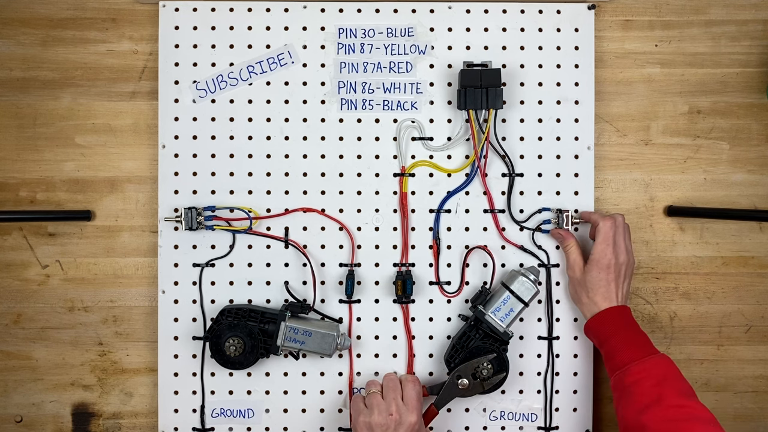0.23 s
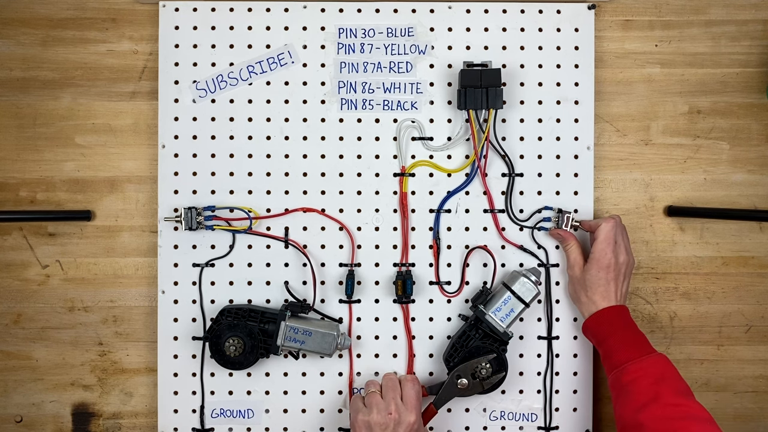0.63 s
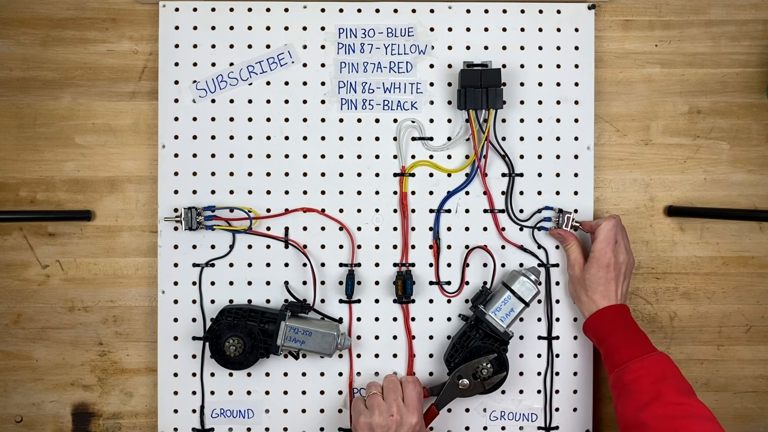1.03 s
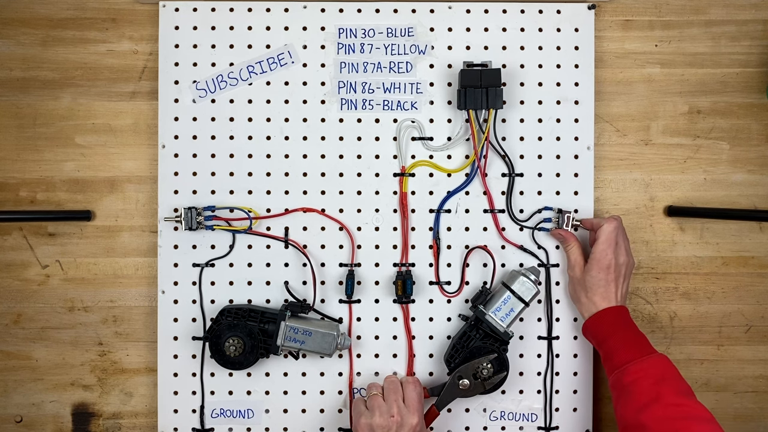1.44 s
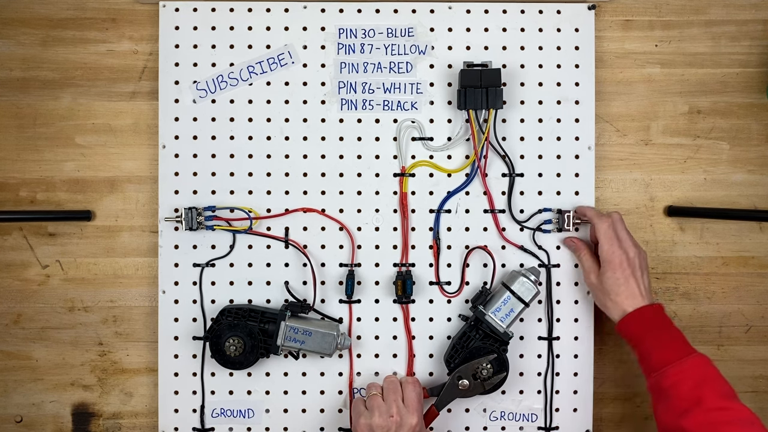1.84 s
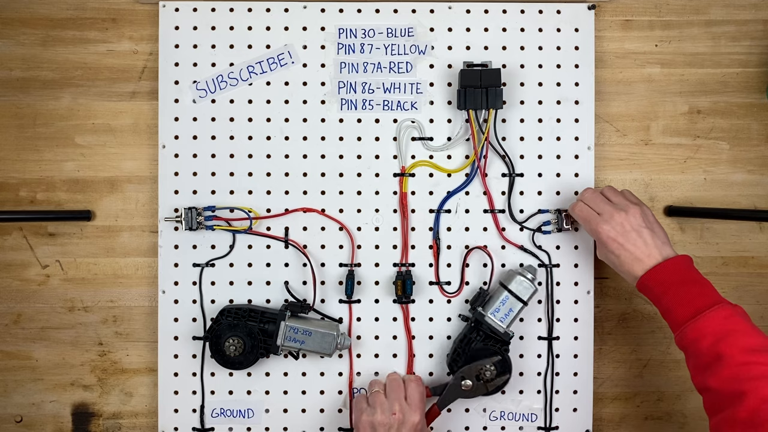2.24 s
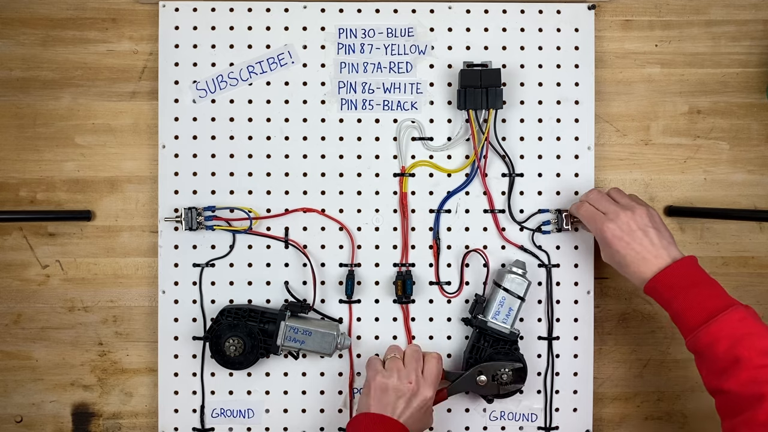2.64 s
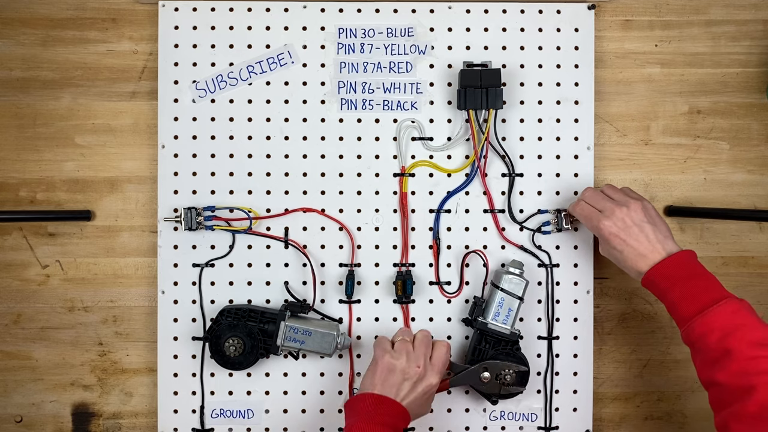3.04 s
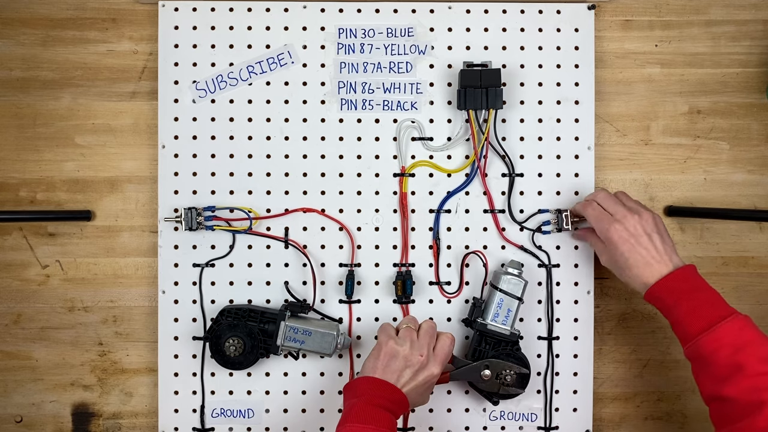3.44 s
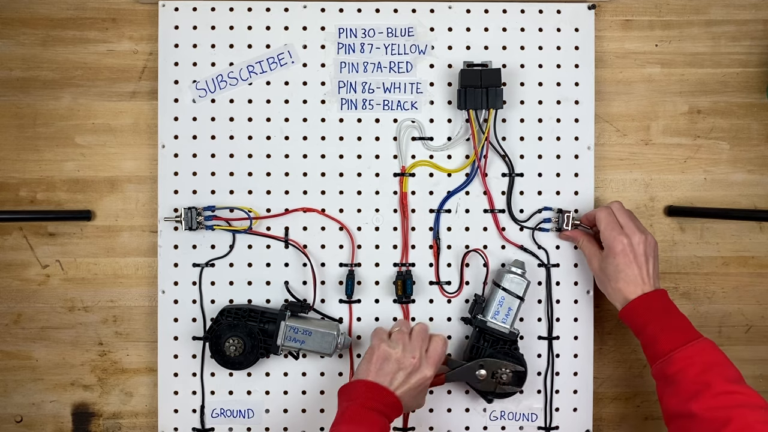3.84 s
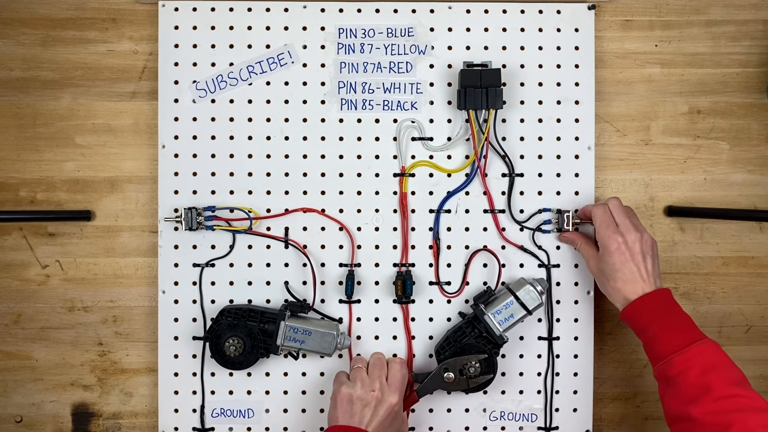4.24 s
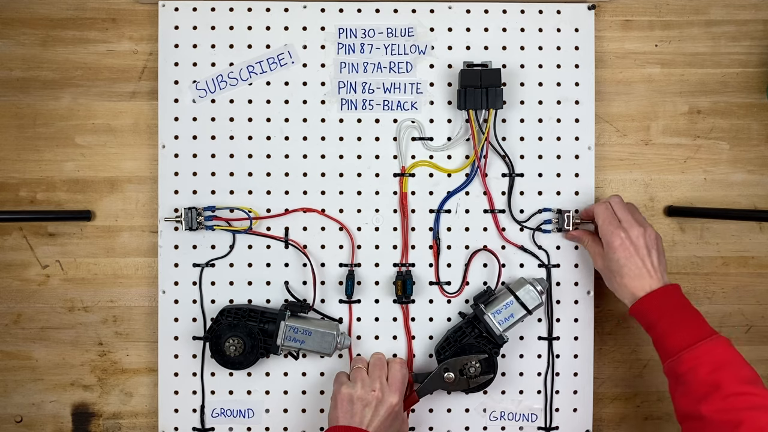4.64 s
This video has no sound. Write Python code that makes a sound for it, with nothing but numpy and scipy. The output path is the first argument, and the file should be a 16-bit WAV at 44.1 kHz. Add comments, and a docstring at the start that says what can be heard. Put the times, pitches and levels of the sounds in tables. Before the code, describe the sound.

A loud steel clatter and board thud come right after the first relay click, then a run of quick alternating switch clicks. After two seconds a gripped motor jerks and whirs briefly, pliers knock and clack, and fingers tap the board. Two more short motor growls follow among further clicks. Close microphone, short small-room echo, low bench rumble, faint buzzing high whine and almost silent air.

```python
"""Toggle switch, relay and geared motor

A toggle switch on a pegboard is flicked on and off; a relay follows it and drives a geared motor gripped
with pliers, which slam on the board or whir under load. Fingers tap, the bench thumps and a supply whines.
Clicks, knocks and taps are short chatters of random contacts sent through filters shaped like each object.
The motor is a stream of grains under a changing load, plus a sung tone; the whine is a swept sine.
Filtered noise makes the bench rumble and the air, and dying bands of noise make the small room."""
import sys
import numpy as np
from scipy import signal
from scipy.fft import rfft, irfft, next_fast_len
from scipy.io import wavfile
from scipy.ndimage import uniform_filter1d

SR = 44100
rng = np.random.default_rng(int(sys.argv[2]) if len(sys.argv) > 2 else 0)


def store_pcm(level_fs):
    """Save levels as 16-bit WAV."""
    pcm = np.round(np.clip(level_fs, -1, 1) * 32767).astype(np.int16)
    wavfile.write(sys.argv[1], SR, np.atleast_2d(pcm).T)


def ratio_of_db(decibels):
    """Turn decibels (scalar or array-like) into linear amplitude factors; 0 dB maps to 1."""
    return 10 ** (np.asarray(decibels, float) / 20)


N = 215252

# Levels in the tables are relative: the functions add a gain or even out the loudness. switch on: relay
# landing, toggle snap, faint haze before them (relay_s, relay_db, toggle_db, haze_db)
SWITCH_ON = [(0.2384, -13, -13.5, -49), (0.933, -13.5, -14, -59.5), (1.277, -13.5, -17.5, -56.5),
             (1.533, -14.5, -14.5, -57.5), (2.165, -12.5, -17, -63), (2.9195, -13.5, -21.5, -51),
             (3.7752, -12.5, -19.5, -57), (4.3542, -13.5, -18.5, -63), (4.8548, -13, -24, -63.5)]
# switch off: click, lever knock on the board and its rebound (click_s, level_db, knock_db, rebound_db, rebound_after_s)
SWITCH_OFF = [(0.7063, -6.5, -27.5, -38, 0.048), (1.17, -6, -28.5, -33.5, 0.043),
              (1.447, -6, -27.5, -36.5, 0.048), (1.695, -6, -26.5, -36, 0.027),
              (4.0874, -6.5, -34.5, -46, 0.046), (4.6053, -6, -36, -51, 0.088)]
# pliers slam on the board (start_s, level_db, hardness_hz, chatter_t60_s, board_thud_db)
PLIER_SLAMS = [(.266, 6.5, 8994, 0.05, -12.5), (2.282, -1, 12140, 0.052, -34),
               (2.426, -5.5, 7900, 0.0566, -44.5)]
# plier jaws clack on the gear (start_s, level_db, hardness_hz, chatter_t60_s)
JAW_CLACKS = [(2.327, -7.5, 9200, 0.05), (3.3607, -5.5, 11970, 0.034)]
# fingers and wires tap the board (start_s, level_db, hardness_hz, chatter_t60_s, swell_ms)
BOARD_TAPS = [(1.436, -32.5, 699, 0.036, 1.0), (1.555, -26, 1500, 0.027, 0.62),
              (1.946, -43, 120, 0.04, 2.6), (2.579, -43, 200, 0.13, 4.8), (2.757, -29, 1080, 0.077, 0.71),
              (2.878, -26, 900, 0.051, 1.8), (2.939, -22, 1600, 0.022, 0.54), (3.082, -29, 499, 0.03, 1.5),
              (3.361, -26, 704.4, 0.1, 0.74), (3.402, -23.5, 2520, 0.075, 0.27),
              (3.477, -42, 1500, 0.061, 3.5), (3.493, -29, 3820, 0.062, 5.3),
              (3.933, -18.5, 504, 0.044, 2.3), (4.408, -42.5, 1503, 0.03, 0.56),
              (4.585, -26, 2500, 0.039, 1.95)]
# thin ticks as the lever's play is taken up (start_s, level_db, hardness_hz, chatter_t60_s)
LEVER_TICKS = [(2.095, -35, 9020, 0.047), (1.581, -42, 15000, 0.028), (2.757, -42, 9000, 0.045),
               (3.356, -30, 9100, 0.0075), (3.720, -40, 4950, 0.07), (3.750, -40, 15020, 0.15),
               (4.717, -48, 6010, 0.07), (4.807, -31.5, 9020, 0.071)]
# a finger slides off the lever (start_s, attack_s, hold_s, release_s, level_db)
FINGER_SLIDE = (1.715, .04, .11, .09, -56)
# three motor runs: load on the gears and ring of the housing (time_s, load_db, housing_db)
MOTOR_RUNS = [
    [(2.17, -46, -47), (2.205, -43, -49), (2.232, -36.5, -57), (2.255, -41, -39), (2.28, -44.5, -38.5),
     (2.36, -54, -55), (2.42, -54, -49.5)],
    [(2.926, -58, -57), (2.97, -53, -46.5), (3.03, -55.5, -53.5), (3.06, -58, -49), (3.15, -71, -54),
     (3.20, -61.5, -55.5), (3.24, -71.5, -60.5)],
    [(3.78, -55.5, -41), (3.80, -44, -40), (3.822, -47, -52), (3.84, -45.5, -48), (3.875, -35.5, -37),
     (3.925, -35, -45), (3.94, -40.5, -53), (3.96, -50.5, -47)],
]
# how gears, brushes and shaft answer the load (level_at_mean_load_db, share_of_load_swing, startup_surge_db)
LOAD_RESPONSE = {"gears": (-45, 0.99, -88), "brushes": (-54, 0.86, -48.5), "shaft": (-57.5, -0.081, -39.5)}
# the pliers' grip in each run detunes the housing and damps the shaft (pitch_ratio, shaft_db)
PLIER_GRIP = [(.83, -10), (1.01, -7), (1.005, -12)]
# a gear tooth catches and the casing rings briefly (start_s, level_db, pitch_hz)
TOOTH_CATCHES = [(2.191, -37, 1090), (2.229, -36, 2380), (2.255, -33, 900), (2.973, -37.5, 1140),
                 (3.011, -37, 1050), (3.796, -36.5, 1120), (3.833, -31.5, 848), (3.872, -29, 2280),
                 (3.880, -43, 1060), (3.921, -38, 1090), (3.935, -30, 2540)]
# jolts to the bench: deep rumble and boom of its top (peak_s, rumble_db, boom_db, swell_s)
BENCH_JOLTS = [(0.272, -45.5, -34, 0.046), (0.302, -34.5, -36.5, 0.05), (2.26, -41.5, -55, 0.17),
               (2.302, -53.5, -33.5, 0.013), (2.34, -50, -49, .04), (2.451, -74.5, -51.5, 0.12),
               (2.789, -50, -52.5, 0.077), (2.961, -54, -47.5, 0.09), (3.129, -69, -55, 0.32),
               (3.38, -72, -54, 0.058), (3.946, -41.5, -37, 0.13), (3.982, -41, -43.5, 0.051),
               (4.02, -51, -53, 0.041), (4.631, -69.5, -54.5, 0.07), (4.875, -50, -57.5, 0.044)]
# the bench at rest, one level each for rumble and boom (level_db)
BENCH_REST = (-66, -72.5)
# supply whine over one ripple of the mains (share_of_cycle, pitch_hz, level_db)
WHINE_SWEEP = [(0, 6450, -72.5), (0.072, 7800, -68.5), (.15, 8900, -68.5), (0.231, 9480, -67),
               (0.331, 9540, -63.5), (.45, 9240, -70), (.7, 7940, -66.5), (1, 6435, -80)]
# how long the room rings, before the share that each sound gets (pitch_hz, t60_s)
ROOM_DECAY = [(200, 0.28), (1000, 0.31), (4000, 0.34), (9000, 0.28), (16000, 0.17)]

# relay, broad colour (pitch_hz, level_db)
RELAY_COLOUR = [(300, -46), (1100, -23), (2100, -17), (3000, -3), (5100, 2.5), (7700, -5.5), (9900, -1),
                (12500, -6), (16100, -11)]
# relay, resonances (pitch_hz, width_hz, level_db)
RELAY_RINGS = [(3150, 200, -1), (4160, 110, -0.5), (5110, 150, -4), (5800, 300, -3), (7530, 110, 0),
               (9860, 160, 1), (11400, 150, -3), (14600, 300, -5.5)]
# toggle snapping on, broad colour (pitch_hz, level_db)
TOGGLE_COLOUR = [(180, -64.5), (300, -43.5), (979, -4.5), (3650, -14.5), (4690, -22.5), (6440, -5),
                 (8840, -7.5), (10800, -0.5), (16100, -9)]
# switch releasing, broad colour (pitch_hz, level_db)
RELEASE_COLOUR = [(300, -39), (1000, -24), (1900, -17), (2900, 1), (4000, -14), (4700, -18), (8200, -11),
                  (9500, -13), (14000, -9), (16100, -19.5)]
# switch releasing, resonances (pitch_hz, width_hz, level_db)
RELEASE_RINGS = [(2360, 120, -6.5), (2908, 125, 1), (3994, 153, -2.5), (5130, 120, -5), (5660, 140, -8),
                 (6170, 99, -9), (7510, 100, -5), (8240, 220, -0.5), (10680, 680, -8.5), (14660, 400, -6)]
# spring that rings on after the release, resonances (pitch_hz, width_hz, level_db)
SPRING_RINGS = [(2345, 20, -4), (2735, 9, -5), (2846, 8, 0), (2920, 10, -3), (3020, 8, -4), (3453, 14, -10),
                (3905, 12, -4)]
# pegboard, broad colour (pitch_hz, level_db)
BOARD_COLOUR = [(120, -46), (200, -33.5), (492, -23), (935, 2.5), (1590, -12.5), (1750, -3.5), (2390, -7),
                (7450, -11.5), (16100, -30)]
# pegboard, resonances (pitch_hz, width_hz, level_db)
BOARD_RINGS = [(620, 27, 1.5), (854, 30, 8), (954, 14, 7.5), (1630, 71, 12.5), (2380, 41, 10),
               (3210, 25, -9), (4300, 30, -5), (6010, 56, -0.5)]
# thud of the board under a slam, resonances (pitch_hz, width_hz, level_db)
THUD_RINGS = [(238, 20, -14), (460, 60, -10.5), (504, 30, -2), (875, 45, -8), (958.5, 59, -1),
              (1092, 18, -2)]
# steel pliers, broad colour (pitch_hz, level_db)
PLIERS_COLOUR = [(35, -47), (100, -28), (320, -31), (600, -11), (1000, -4), (1630, -6), (2100, -6),
                 (2920, -9.5), (7790, -3), (16100, -10.5)]
# steel pliers, resonances (pitch_hz, width_hz, level_db)
PLIERS_RINGS = [(1390.6, 71, 3.5), (1500, 45, -4.5), (1620, 59, 0.5), (2115, 120, 3.5), (2280, 65, 1.5),
                (2360, 17, 1), (5500, 410, -9.5), (7900, 260, -10)]
# plier jaws, broad colour (pitch_hz, level_db)
JAWS_COLOUR = [(180, -69), (300, -61), (843, -55), (2570, -13.5), (4110, 3.5), (5100, -3.5), (6880, 6.5),
               (9450, -7), (11700, -2), (16100, -21)]
# plier jaws, resonances (pitch_hz, width_hz, level_db)
JAWS_RINGS = [(3080, 140, 0.5), (4360, 50, -5), (6870, 130, 11), (7700, 150, 3), (10750, 300, -3.5)]
# switch lever, broad colour (pitch_hz, level_db)
LEVER_COLOUR = [(290, -71), (500, -20.5), (1230, -8), (1620, 4.5), (4530, -12), (5550, 6), (8450, -18),
                (16000, -1.5)]
# skin rubbing over the lever, also the colour of the haze before clicks, broad colour (pitch_hz, level_db)
SKIN_COLOUR = [(180, -47.5), (300, -26), (603, -27), (762, -4.5), (1140, -15), (1230, -8.5), (2360, -12),
               (16000, -16.5)]
# gear teeth, broad colour (pitch_hz, level_db)
GEARS_COLOUR = [(150, -70), (250, -55), (758, -4), (1010, -6.5), (1090, -13.5), (1170, -10), (2330, -9),
                (9000, -18), (11700, -39.5), (19800, -120)]
# gear teeth, resonances (pitch_hz, width_hz, level_db)
GEARS_RINGS = [(2269, 110, -4), (3595, 110, -5), (2910, 70, -4.5)]
# motor housing before the grip detunes it, resonances (pitch_hz, width_hz, level_db)
HOUSING_RINGS = [(1092, 60, -2), (860, 60, -3), (1350, 70, -4)]
# motor brushes, broad colour (pitch_hz, level_db)
BRUSHES_COLOUR = [(2000, -18), (6000, -6), (11000, 2.5), (16000, -7)]
# motor shaft, resonances (pitch_hz, width_hz, level_db)
SHAFT_RINGS = [(9170, 45, -7), (10500, 50, 0), (10620, 55, -2), (7500, 80, -13)]
# faint flat floor under pure resonances (pitch_hz, level_db)
FAINT_FLOOR = [(100, -50), (16000, -50)]
# deep rumble through the bench legs, broad colour (pitch_hz, level_db)
RUMBLE_COLOUR = [(15, -8), (35, 7), (60, -3), (100, -11.5), (300, -41.5), (1500, -76)]
# boom of the bench top, broad colour (pitch_hz, level_db)
BOOM_COLOUR = [(40, -46.5), (80, -25), (170, -24), (450, -21), (1500, -67.5)]
# boom of the bench top, resonance (pitch_hz, width_hz, level_db)
BOOM_RINGS = [(108.6, 18, 0.0077)]
# quiet air of the workshop, broad colour (pitch_hz, level_db)
AIR_COLOUR = [(150, 4.5), (400, -5), (1000, -10.5), (2500, -23.5), (6000, -25.5), (16000, -27)]


def rms_one(x):
    """Scale to rms 1."""
    return x / np.sqrt(np.mean(x ** 2) + 1e-20)


def at_hz(points, hz):
    """Read a (pitch_hz, value) table on a log pitch axis."""
    table_hz, values = np.array(points).T
    return np.interp(np.log(hz + 1), np.log(table_hz), values)


def in_time(s, level_db):
    """Read a dB curve at every sample."""
    return np.interp(np.arange(N) / SR, s, level_db)


def body(x, spectrum, rings=(), ring_db=0.0):
    """An object as a causal filter: a broad colour plus resonances, with a mean power gain of 1."""
    size = next_fast_len(N + SR // 2)
    hz = np.arange(size // 2 + 1) * SR / size
    power = ratio_of_db(at_hz(spectrum, hz)) ** 2
    for centre_hz, width_hz, level_db in rings:
        power = power + ratio_of_db(level_db + ring_db) ** 2 / (1 + (2 * (hz - centre_hz) / width_hz) ** 2)
    cepstrum = irfft(np.log(power / power.mean()) / 2, size)
    cepstrum[1:size // 2] *= 2      # folding gives minimum phase: nothing sounds before the blow
    cepstrum[size // 2 + 1:] = 0
    return irfft(rfft(x, size) * np.exp(rfft(cepstrum)), size)[:N]


def grains(shape, share, spread_db):
    """Sparse contacts of uneven size and random sign, rms 1; `share` of the samples hold one."""
    sizes = ratio_of_db(spread_db * np.minimum(rng.exponential(1, shape), 4)) * rng.choice([-1, 1], shape)
    return rms_one(sizes * (rng.random(shape) < share))


def flutter(depth_db, size):
    """A random gain that wavers over about `size` samples."""
    smooth = uniform_filter1d(uniform_filter1d(rng.standard_normal(N), size), size)
    return ratio_of_db(depth_db * rms_one(smooth))


def blows(times, level_db, hard_hz, t60, rise_ms, lead=0.0):
    """Each blow is a chatter of contacts that swells and dies; `lead` adds a strong contact at its top."""
    out, t = np.zeros(N + SR), np.arange(SR // 5) / SR
    chatter = grains((len(times), len(t)), share=0.25, spread_db=2.5)
    for k, (s, db, hz, decay, rise) in enumerate(np.broadcast(times, level_db, hard_hz, t60, rise_ms)):
        soft = np.exp(-2 * np.pi * hz / SR)      # a lower hardness makes a duller blow
        shape = (1 - np.exp(-1000 * t / rise)) ** 2 * ratio_of_db(-60 * t / decay)
        struck_once = lead * (shape == shape.max())
        contacts = rms_one(signal.lfilter([1], [1, -soft], chatter[k] + struck_once))
        at = round(s * SR)
        out[at:at + len(t)] += ratio_of_db(db) * shape / shape.max() * contacts
    return out[:N]


def struck(rows, spectrum, rings, gain_db, rise_ms, lead):
    """Blows from a table, sounding through one body."""
    s, level_db, hard_hz, t60 = np.transpose(rows)
    return body(blows(s, level_db + gain_db, hard_hz, t60, rise_ms, lead=lead), spectrum, rings)


def supply():
    """A tone swept up and down by the mains ripple, weakest at its low end, with a faint bench echo."""
    ripple_hz, ripple_start = 120.02, 0.47
    share, hz, level_db = np.transpose(WHINE_SWEEP)
    cycle = (ripple_start + ripple_hz * np.arange(N) / SR) % 1
    wander = 1 + 0.0024 * rms_one(uniform_filter1d(rng.standard_normal(N), size=400))
    turns = np.cumsum(np.interp(cycle, share, hz) * wander) / SR
    tone = np.sqrt(2) * ratio_of_db(np.interp(cycle, share, level_db)) * np.sin(2 * np.pi * turns)
    return tone + ratio_of_db(-20.0) * np.roll(tone, round(0.00034 * SR))


def bench():
    """Deep rumble through the legs and boom of the bench top: a wavering rest level plus jolts."""
    waver_db = 1.5
    swell_db, fall_db_per_s = 29, 453        # a jolt climbs this far during its swell, then drops
    tail_db, tail_db_per_s = -20, 98.5       # and leaves a slower shiver
    waver = np.array([flutter(waver_db, size=3000), flutter(waver_db, size=3000)])
    power = ratio_of_db(np.array(BENCH_REST))[:, None] ** 2 * waver ** 2
    for s, rumble_db, boom_db, swell_s in BENCH_JOLTS:
        t = np.arange(N) / SR - s
        before = ratio_of_db(swell_db * np.minimum(t, 0) / swell_s)
        after = ratio_of_db(-fall_db_per_s * np.abs(t)) + ratio_of_db(tail_db - tail_db_per_s * np.abs(t))
        shape = np.where(t < 0, before, after)
        power = power + (ratio_of_db(np.array([[rumble_db], [boom_db]])) * shape) ** 2
    rumble_gain, boom_gain = np.sqrt(power)
    rumble = rms_one(body(rng.standard_normal(N), RUMBLE_COLOUR))
    boom = rms_one(body(rng.standard_normal(N), BOOM_COLOUR, BOOM_RINGS))
    return rumble_gain * rumble + boom_gain * boom


def air():
    """The quiet air of the workshop is steady, coloured noise."""
    return ratio_of_db(-70) * body(rng.standard_normal(N), [(60, -27.5)] + AIR_COLOUR)


def haze(s, haze_db):
    """A faint haze of noise swells up just before each click."""
    return body(blows(s - 0.034, haze_db, 9000, 0.1, rise_ms=30.0), SKIN_COLOUR)


def switch_on():
    """The toggle snaps, then the relay armature lands and its housing knocks the board."""
    relay_lag_s, knock_after_s = 0.008, 0.0074
    s, relay_db, toggle_db, haze_db = np.transpose(SWITCH_ON)
    snap = blows(s - relay_lag_s, toggle_db - 8, 16000, 0.076, rise_ms=0.59)
    landing = blows(s, relay_db - 8, 15000, 0.027, rise_ms=0.4, lead=7.4)
    knock = blows(s + knock_after_s, relay_db - 34.5, 1700, 0.025, rise_ms=3.8)
    toggle = body(snap, TOGGLE_COLOUR, RELAY_RINGS, ring_db=-12.0)
    relay = body(landing, RELAY_COLOUR, RELAY_RINGS, ring_db=12.5)
    return haze(s, haze_db) + toggle + relay + body(knock, BOARD_COLOUR, BOARD_RINGS, ring_db=-2.0)


def slams():
    """Steel clatters on top while the board thuds below."""
    s, level_db, hard_hz, t60, thud_db = np.transpose(PLIER_SLAMS)
    clatter = blows(s, level_db - 4.5, hard_hz, t60, rise_ms=0.45, lead=3.0)
    thud = blows(s, thud_db - 2.5, 1300, 0.019, rise_ms=0.22, lead=16.0)
    return body(clatter, PLIERS_COLOUR, PLIERS_RINGS, ring_db=-2.0) + body(thud, FAINT_FLOOR, THUD_RINGS)


def switch_off():
    """A faint tick, then a snap and a sharp crack; a spring rings on and the lever knocks the board twice."""
    knock_after_s, spring_db = 0.0095, -11.5
    s, level_db, knock_db, rebound_db, rebound_after_s = np.transpose(SWITCH_OFF)
    tick = blows(s - 0.0055, level_db - 41.5, 15000, 0.012, rise_ms=0.24)
    snap = blows(s - 0.001, level_db - 15.5, 22400, 0.047, rise_ms=1.0)
    crack = blows(s + 0.0015, level_db - 16.5, 20000, 0.008, rise_ms=0.14, lead=10.0)
    knock = blows(s + knock_after_s, knock_db - 4.0, 3400, 0.041, rise_ms=0.052)
    rebound = blows(s + rebound_after_s, rebound_db - 13.5, 490, 0.081, rise_ms=0.77)
    release = body(tick + snap + crack, RELEASE_COLOUR, RELEASE_RINGS, ring_db=6.5)
    spring = ratio_of_db(spring_db) * body(crack, FAINT_FLOOR, SPRING_RINGS)
    knocks = body(knock + rebound, BOARD_COLOUR, BOARD_RINGS, ring_db=-15.0)
    return haze(s, level_db - 52.5) + release + spring + knocks


def taps():
    """Small contacts of fingers and wires sound through the board."""
    s, level_db, hard_hz, t60, swell_ms = np.transpose(BOARD_TAPS)
    contacts = blows(s, level_db - 18.0, hard_hz, t60, swell_ms)
    return body(contacts, BOARD_COLOUR, BOARD_RINGS, ring_db=-9.5)


def ticks():
    """The lever's play is taken up with a thin tick."""
    return struck(LEVER_TICKS, LEVER_COLOUR, (), gain_db=-6.5, rise_ms=0.13, lead=3.4)


def slide():
    """Skin rubs over the lever: dense grains fade in, hold and fade out."""
    s, attack_s, hold_s, release_s, level_db = FINGER_SLIDE
    t = np.arange(N) / SR - s
    fade_out = 1 - (t - attack_s - hold_s) / release_s
    shape = np.clip(np.minimum(t / attack_s, fade_out), 0, 1) ** 2
    rub = body(grains(N, share=0.87, spread_db=4.0), SKIN_COLOUR, [(2600, 2500, -6)])
    return ratio_of_db(level_db) * shape * flutter(1.5, size=600) * rub


def motor():
    """Gears grind, the housing hums, brushes hiss and the shaft rings in fits, all shaped by each run."""
    mean_load_db, mesh_hz, mesh_db = -47, 1092, -2.5
    spin_up_s, surge_s, coast_db_per_s = 0.0078, 0.083, 646
    grind = flutter(1.93, size=200) * grains(N, share=0.032, spread_db=0.5)
    grind = body(grind, GEARS_COLOUR, GEARS_RINGS)
    shaking = flutter(2.2, size=250) * grains(N, share=0.2, spread_db=2.5)
    brushes = body(flutter(1.5, size=250) * grains(N, share=0.26, spread_db=7.0), BRUSHES_COLOUR)
    shaft = body(flutter(4, size=600) * grains(N, share=0.15, spread_db=2.5), FAINT_FLOOR, SHAFT_RINGS)
    out, t, speed = 0, np.arange(N) / SR, flutter(0.1, size=900)
    for rows, (ratio, shaft_db) in zip(MOTOR_RUNS, PLIER_GRIP):
        hum = ratio_of_db(-3) * body(shaking, FAINT_FLOOR, np.array(HOUSING_RINGS) * [ratio, 1, 1])
        # the gear teeth sing a thin note over the hum, detuned by the grip
        mesh_turns = mesh_hz * ratio * np.cumsum(speed) / SR
        hum = hum + ratio_of_db(mesh_db) * np.sqrt(2) * np.sin(2 * np.pi * mesh_turns)
        s, load_db, housing_db = np.transpose(rows)
        since = np.maximum(t - s[0], 0)
        swing_db = in_time(s, load_db) - mean_load_db
        coast = ratio_of_db(-np.minimum(coast_db_per_s * np.maximum(t - s[-1], 0), 200))
        running = (1 - np.exp(-since / spin_up_s)) ** 2 * coast
        out = out + running * ratio_of_db(in_time(s, housing_db)) * hum
        parts = (grind, brushes, ratio_of_db(shaft_db) * shaft)
        for sound, (level_db, share, surge_db) in zip(parts, LOAD_RESPONSE.values()):
            surge = ratio_of_db(surge_db) * np.exp(-since / surge_s)
            out = out + running * (ratio_of_db(level_db + share * swing_db) + surge) * sound
    return out


def catches():
    """A short scrape rings the casing at the pitch of that catch and clicks through the gears."""
    ring_cycles, click_db = 34, -15.5      # cycles until the ring has died by 60 dB; click beside the ring
    out, t = np.zeros(N + SR), np.arange(SR // 10) / SR
    scrape = grains((len(TOOTH_CATCHES), len(t)), share=0.061, spread_db=-3.5) * ratio_of_db(-60 * t / 0.0099)
    clicks = out.copy()
    for k, (s, db, hz) in enumerate(TOOTH_CATCHES):
        r = ratio_of_db(-60 * hz / (ring_cycles * SR))
        at = round(s * SR)
        resonator = [1, -2 * r * np.cos(2 * np.pi * hz / SR), r * r]
        ring = signal.lfilter([1], resonator, scrape[k] + 2.6 * (t == 0))
        out[at:at + len(t)] += ratio_of_db(db) * ring / np.abs(ring).max()
        clicks[at:at + len(t)] += ratio_of_db(db + click_db) * scrape[k]
    return out[:N] + body(clicks[:N], GEARS_COLOUR, GEARS_RINGS)


def clacks():
    """The plier jaws clack on the gear, the second jaw landing just after the first."""
    first = struck(JAW_CLACKS, JAWS_COLOUR, JAWS_RINGS, gain_db=-11, rise_ms=0.15, lead=10)
    return first + ratio_of_db(-2) * np.roll(first, round(0.0015 * SR))


def room(x, share):
    """Echoes as noise: each narrow band stores energy, builds up and dies at its own rate times `share`."""
    build_s, first_wall_s = 0.0011, 0.0037
    edges = 140 * 2 ** np.arange(0, 7, 0.25)
    out, white = 0, rng.standard_normal((2, N))
    build = np.exp(-1 / (build_s * SR))
    for k, (low, high) in enumerate(zip(edges, edges[1:])):
        band = signal.butter(2, [low, high], "band", fs=SR, output="sos")
        keep = ratio_of_db(-120 / (share * at_hz(ROOM_DECAY, low) * SR))      # energy falls 60 dB in share * t60
        build_and_die = np.convolve([1, -keep], [1, -build])
        energy = signal.lfilter([(1 - keep) * (1 - build)], build_and_die, signal.sosfilt(band, x) ** 2)
        out = out + np.sqrt(np.abs(energy)) * rms_one(signal.sosfilt(band, white[k % 2]))
    return np.concatenate([np.zeros(round(first_wall_s * SR)), out])[:N]


def scene():
    """Everything on the board, its room, and the quiet floor."""
    board = switch_on() + switch_off() + taps() + ticks() + slide() + motor() + catches() + clacks()
    # small parts radiate no bass
    board = signal.sosfilt(signal.butter(2, 470, "high", fs=SR, output="sos"), board)
    slam = slams()
    # the walls swallow the top of the slam's echoes
    dull_slam = signal.sosfilt(signal.butter(1, 11000, fs=SR, output="sos"), slam)
    # small clicks stir mostly the near, quicker surroundings; under a slam the whole board radiates
    tails = ratio_of_db(-16) * room(board, share=0.65) + ratio_of_db(-14.5) * room(dull_slam, share=0.86)
    return (board + slam + tails + bench() + air() + supply())[None]


def roll_off(x):
    """The treble ends steeply here."""
    return signal.sosfilt(signal.butter(12, 16250, fs=SR, output="sos"), x)


def record(dry):
    """The extreme top is cut, then the converter overloads wherever the mix passes full scale."""
    top_cut_hz = 16350
    cut = signal.sosfilt(signal.cheby2(10, 50, top_cut_hz, fs=SR, output="sos"), dry)
    return roll_off(np.clip(cut, -1, 1))


dry = scene()
out = record(dry)
store_pcm(out)
```